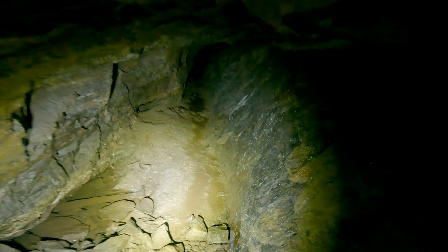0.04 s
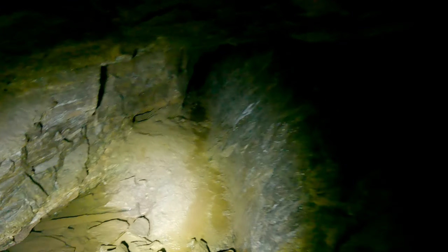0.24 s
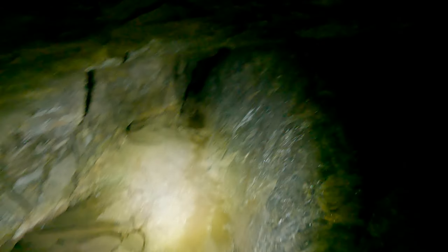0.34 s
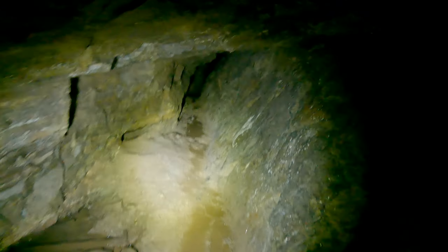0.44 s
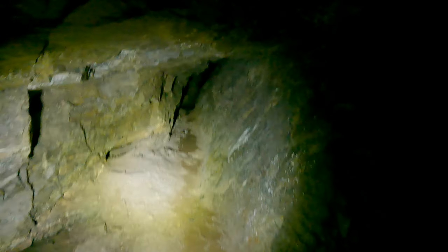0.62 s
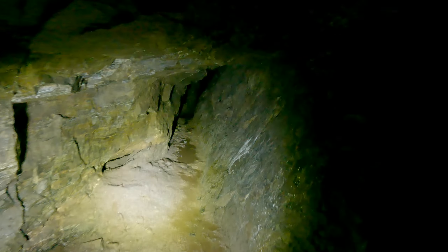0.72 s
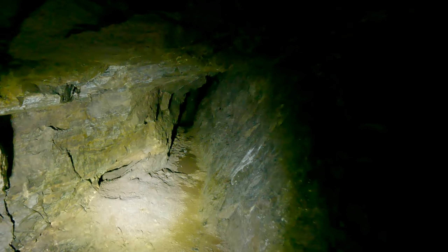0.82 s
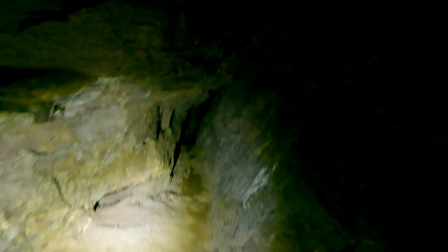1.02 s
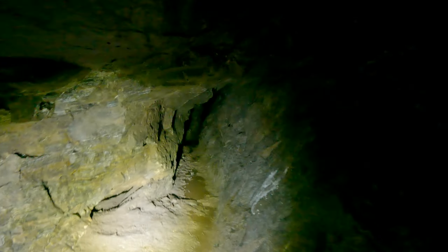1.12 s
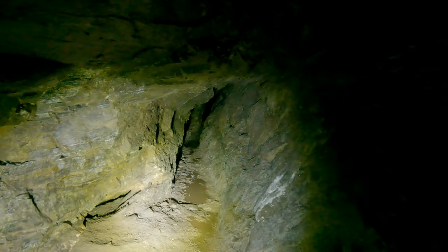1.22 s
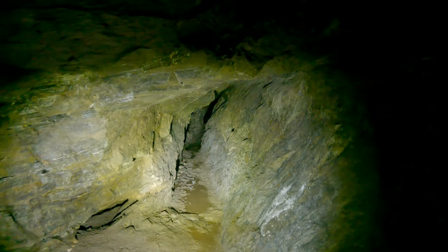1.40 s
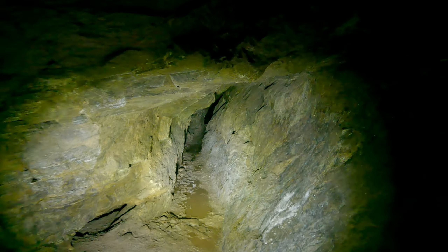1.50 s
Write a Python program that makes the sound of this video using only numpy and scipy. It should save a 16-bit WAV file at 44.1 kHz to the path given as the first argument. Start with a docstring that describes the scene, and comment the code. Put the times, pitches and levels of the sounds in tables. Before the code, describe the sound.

Dull, heavy footsteps sound close by in a rocky underground tunnel. One step crushes grit and drags, then two more follow. The near walls throw each step back, and a faint low rumble lies underneath.

```python
"""A faint rumble fills a narrow mine passage. Grit shifts under a boot and small stones tick.
The first slow step lands at 0.2 s: weight thuds and booms, the heel knocks, the sole crushes grit.
A scuff drags at 0.4 s; two more steps follow at 0.66 and 1.15 s, with a thin sizzle on the left.
Close walls throw each step back, and the passage rings on at its low resonances."""
import sys
import numpy as np
from scipy import signal
from scipy.fft import rfft, irfft
from scipy.io import wavfile

SR = 44100
rng = np.random.default_rng(int(sys.argv[2]) if len(sys.argv) > 2 else 0)


def int16_out(signal):
    """Quantize to a 16-bit WAV file."""
    q = np.round(np.clip(np.atleast_2d(signal).T, -1, 1) * 32767)
    wavfile.write(sys.argv[1], SR, q.astype(np.int16))


N = 68355
T = np.arange(N) / SR
TOP_HZ = 15850


def undb(db):
    """Decibels to gain."""
    return 10 ** (np.asarray(db) / 20)


def unit(x):
    """Scale to rms 1."""
    return x / np.sqrt(np.mean(x ** 2))


def at_hz(hz, points):
    """Read a table on a log-frequency axis."""
    freqs, values = np.array(points, float).T
    return np.interp(np.log(np.maximum(hz, 1)), np.log(freqs), values)


def colour(x, spectrum, tilt_db_oct=0, size=4096):
    """Minimum-phase filter of unit power with the given spectrum, tilted about 1 kHz."""
    hz = np.maximum(np.arange(size // 2 + 1) * SR / size, 1)
    octaves = np.log2(np.clip(hz, 200, 6000) / 1000)
    cepstrum = irfft(np.log(undb(at_hz(hz, spectrum) + tilt_db_oct * octaves)))
    cepstrum[1:size // 2] *= 2
    cepstrum[size // 2 + 1:] = 0
    response = irfft(np.exp(rfft(cepstrum)))
    return signal.fftconvolve(x, response / np.linalg.norm(response))[:N]


def band(x, lo_hz, hi_hz, order=2):
    """Butterworth band-pass."""
    return signal.sosfilt(signal.butter(order, [lo_hz, hi_hz], "band", fs=SR, output="sos"), x)


def blow(start_s, rise_s, fade_s):
    """Impact envelope: exponential rise and decay."""
    age = np.maximum(T - start_s, 0)
    return (1 - np.exp(-age / rise_s)) * np.exp(-age / fade_s)


def swell(peak_s, rise_s, fade_s):
    """Rubbing envelope: Gaussian rise, exponential decay."""
    return np.exp(-(np.minimum(T - peak_s, 0) / rise_s) ** 2 - np.maximum(T - peak_s, 0) / fade_s)


def ring(start_s, hz, rise_s, fade_s):
    """One damped resonance."""
    return blow(start_s, rise_s, fade_s) * np.sin(2 * np.pi * hz * (T - start_s))


# air noise spectrum (frequency [Hz], relative level [dB])
RUMBLE_SPECTRUM = [(20, 10), (60, -8), (120, -5), (250, -22), (400, -16), (1000, -21.5), (2000, -30),
                   (3500, -42.5), (6000, -56.5), (10000, -72)]
# air noise resonances (frequency [Hz], level [dB])
RUMBLE_BANDS = [(86, -50.5), (122, -46.5), (205, -53), (252, -52.5)]


def rumble(edge_ratio=1.1, broadband_db=-37.5):
    """Dull air noise of the mine, gathering at its resonances."""
    drone = np.zeros(N)
    for hz, db in RUMBLE_BANDS:
        drone += undb(db) * unit(band(rng.standard_normal(N), hz / edge_ratio, hz * edge_ratio))
    return drone + undb(broadband_db) * colour(rng.standard_normal(N), RUMBLE_SPECTRUM)


# wall and roof echoes (delay [s], relative level [dB])
WALL_ECHOES = [(.0092, -17.5), (0.0205, -13.5), (0.0283, -14.5), (0.04, -10.5)]
# reverberation time (frequency [Hz], T60 [s])
TAIL_T60 = [(100, 0.9), (250, 0.61), (600, 0.47), (1500, 0.57), (3500, 0.41), (9000, 0.33)]


def passage(x, tail_db=-2.5, walls_db=0):
    """Direct sound, close wall echoes and a diffuse tail that is longest in the bass."""
    log_hz = np.log(np.arange(N // 2 + 1) * SR / N + 1)
    centres_hz = np.geomspace(60, 15000, 9)
    noise_spectrum = rfft(rng.standard_normal(N))
    response = np.zeros(N)
    for hz, weights in zip(centres_hz, np.eye(len(centres_hz))):
        noise_band = irfft(noise_spectrum * np.interp(log_hz, np.log(centres_hz), weights), N)
        response += noise_band * blow(0, rise_s=0.0049, fade_s=at_hz(hz, TAIL_T60) / np.log(1000))
    response *= undb(tail_db) / np.linalg.norm(response)
    response[0] += 1  # direct path
    for delay_s, db in WALL_ECHOES:
        response[int(delay_s * SR)] += undb(db + walls_db)
    return signal.fftconvolve(x, response / np.linalg.norm(response))[:N]


def grains(rate_per_s=3000, spread_db=3):
    """Grit crackle: dense random clicks of uneven size."""
    hits = rng.random(N) < rate_per_s / SR
    signs = rng.choice([-1, 1], N)
    sizes = undb(spread_db * np.clip(rng.standard_normal(N), -2, 2))
    return unit(hits * signs * sizes)


# crushed grit spectrum (frequency [Hz], relative level [dB])
GRIT_SPECTRUM = [(60, -6.5), (200, 3.5), (380, -2.5), (600, 1), (1100, -5), (2000, -14.5), (3200, -24),
                 (5000, -39), (8000, -55.5), (11000, -78)]
# sole rubs (peak time [s], rise [s], fade [s], level [dB], tilt [dB/oct])
SOLE_RUBS = [(0.005, .02, 0.048, -40, 1), (0.182, 0.02, 0.08, -33.5, 0), (0.218, 0.0053, 0.044, -22.5, 1),
             (0.384, 0.017, .018, -24.5, 0.5), (0.43, .016, 0.026, -25, 2), (0.462, 0.028, 0.09, -26.5, -2),
             (0.668, .02, 0.058, -28, 1), (0.806, 0.037, 0.028, -39, 1.5), (0.978, 0.038, 0.023, -44.5, 2),
             (1.11, .03, 0.017, -44, 2.5), (1.149, 0.0053, 0.046, -28.5, 2.5),
             (1.175, 0.028, 0.019, -22, -1.5), (1.235, 0.025, 0.056, -30, -5.5),
             (1.335, 0.017, 0.01, -46.5, 8), (1.39, 0.038, 0.015, -39.5, -1.5)]


def scuffs(spot_count=5):
    """The sole crushes grit at a few spots, each with its own reverberant tail."""
    spots = np.zeros((spot_count, N))
    for k, (peak_s, rise_s, fade_s, db, tilt_db_oct) in enumerate(SOLE_RUBS):
        crunch = undb(db) * grains() * swell(peak_s, rise_s, fade_s)
        spots[k % spot_count] += colour(crunch, GRIT_SPECTRUM, tilt_db_oct)
    return sum(passage(spot) for spot in spots)


# loose stones (time [s], relative level [dB], pitch [Hz])
STONE_CLICKS = [(0.045, -40, 1530), (0.085, -45, 2200), (0.118, -30.5, 627), (0.598, -42.5, 3230),
                (0.802, -53, 2850)]


def stones():
    """Small stones shift with short dull clicks."""
    clicks = np.zeros(N)
    for start_s, db, hz in STONE_CLICKS:
        noise = unit(band(rng.standard_normal(N), hz / 2, hz * np.sqrt(2), order=4))
        clicks += 2 * undb(db) * blow(start_s, rise_s=0.00033, fade_s=0.0023) * noise
    return passage(clicks, tail_db=-1, walls_db=-8.5)


# heel knock spectrum (frequency [Hz], relative level [dB])
KNOCK_SPECTRUM = [(100, -3), (300, 4), (550, 1), (850, -3), (1250, -3.5), (2000, -20), (3200, -26.5),
                  (5000, -40.5), (9000, -70)]
# low passage resonances (frequency [Hz], relative level [dB], T60 [s])
PASSAGE_MODES = [(57, -5, 0.6), (87.8, 0, 0.55), (121.1, 1, 1.0), (134.1, 4.5, 0.48), (167, -11, 0.17),
                 (187.2, -11, 1), (210.9, -1, 0.76), (253.5, 0.5, 0.79), (282, -4.5, 0.65)]
# heel and sole contacts, levels relative (time [s], thud [dB], thud pitch [Hz], boom [dB],
# knock [dB], knock rise [s], knock tilt [dB/oct], passage ring [dB])
BOOT_CONTACTS = [(0.2115, -10, 228, -23, -17, 0.00071, 0, -38),
                 (0.229, -11, 160.4, -37, -22, 0.0004, 2, -35.5),
                 (0.265, -20, 176.9, -23.5, -25, 0.0014, -2.5, -34),
                 (0.408, -34, 126.8, -25.5, -35.5, 0.0011, -8, -38.5),
                 (0.465, -21, 199.4, -42.5, -22, .0012, .5, -33),
                 (0.661, -13.5, 206, -47.5, -11.5, 0.0076, -3, -36.5),
                 (0.678, -16.5, 264.4, -37.5, -19, .003, -2.5, -38),
                 (0.701, -20, 170, -23, -37.5, 0.0023, -3.5, -35),
                 (1.116, -44, 248, -44, -27, 0.0057, 0.5, -59),
                 (1.151, -23.5, 242.6, -28, -23, 0.0028, 0.5, -30),
                 (1.178, -32, 124.4, -20.5, -23, 0.0026, 0.5, -29)]


def footfalls(spot_count=3, boom_hz=62.6):
    """The boot's weight thuds and booms, its heel knocks, and the passage starts to ring."""
    thuds, ringing = np.zeros((2, N))
    spots = np.zeros((spot_count, N))
    for k, contact in enumerate(BOOT_CONTACTS):
        start_s, thud_db, thud_hz, boom_db, knock_db, knock_rise_s, tilt_db_oct, ring_db = contact
        thuds += 2 * undb(thud_db) * ring(start_s, thud_hz, rise_s=0.0066, fade_s=0.022)
        thuds += 2 * undb(boom_db) * ring(start_s, boom_hz, rise_s=0.0058, fade_s=0.021)
        knock = 2 * undb(knock_db) * blow(start_s, knock_rise_s, fade_s=0.01) * rng.standard_normal(N)
        spots[k % spot_count] += colour(knock, KNOCK_SPECTRUM, tilt_db_oct)
        for mode_hz, mode_db, t60_s in PASSAGE_MODES:
            mode = ring(start_s, mode_hz, rise_s=0.0055, fade_s=t60_s / np.log(1000))
            ringing += undb(ring_db + mode_db) * mode
    return passage(thuds, tail_db=-9, walls_db=-11) + sum(passage(spot) for spot in spots) + ringing


# sizzle swells (peak time [s], fade [s], left level [dB])
SIZZLE_SWELLS = [(0.218, 0.041, -54.5), (0.348, 0.027, -58), (0.389, .02, -57.5), (0.431, 0.041, -52),
                 (0.661, 0.051, -58.5), (0.85, .02, -64.5), (1.035, 0.0066, -75), (1.149, .045, -56.5),
                 (1.325, 0.021, -71)]


def sizzle(lo_hz=11850, rise_s=0.012, floor_db=-79.5, right_db=-29):
    """Thin high hiss, nearly all on the left, swells from a faint floor as the walker moves."""
    hiss = colour(rng.standard_normal(N), [(lo_hz, 0), (TOP_HZ, -5)])
    hiss = unit(band(hiss, lo_hz, TOP_HZ, order=10))
    swells = sum(undb(db) * swell(peak_s, rise_s, fade_s) for peak_s, fade_s, db in SIZZLE_SWELLS)
    pan = np.array([[1], [undb(right_db)]])
    return hiss * (undb(floor_db) + swells) * pan


def scene():
    """Stereo mix; all but the sizzle is centred."""
    return rumble() + scuffs() + stones() + footfalls() + sizzle()


# stereo side spectrum (frequency [Hz], relative level [dB])
SIDE_SPECTRUM = [(200, -40.5), (1000, -11.5), (4000, 7.5), (8000, 6.5), (12000, 2.5)]


def record(dry, side_db=-22.5, smear_samples=2048):
    """A smeared side signal adds slight width; a steep low-pass cuts the top."""
    smear = rng.standard_normal(smear_samples) * np.linspace(1, 0, smear_samples) ** 2
    smeared_mid = signal.fftconvolve(dry.mean(axis=0), smear / np.linalg.norm(smear))[:N]
    side = undb(side_db) * colour(smeared_mid, SIDE_SPECTRUM)
    lowpass = signal.ellip(8, 0.2, 80, TOP_HZ, fs=SR, output="sos")
    return signal.sosfilt(lowpass, dry + side * np.array([[1], [-1]]))


dry = scene()
out = record(dry)
int16_out(out)
```